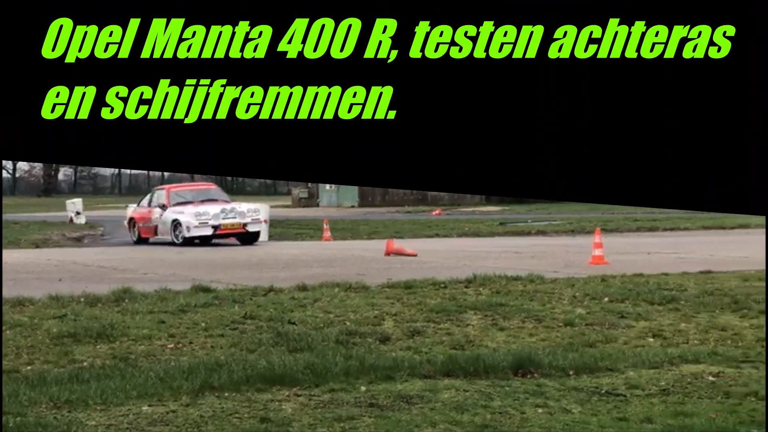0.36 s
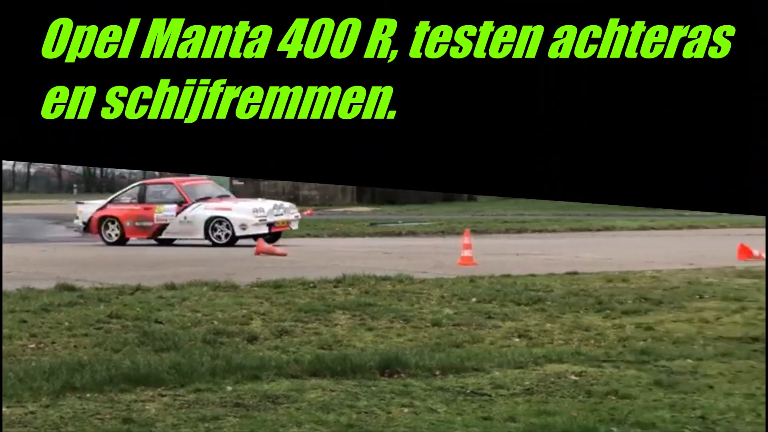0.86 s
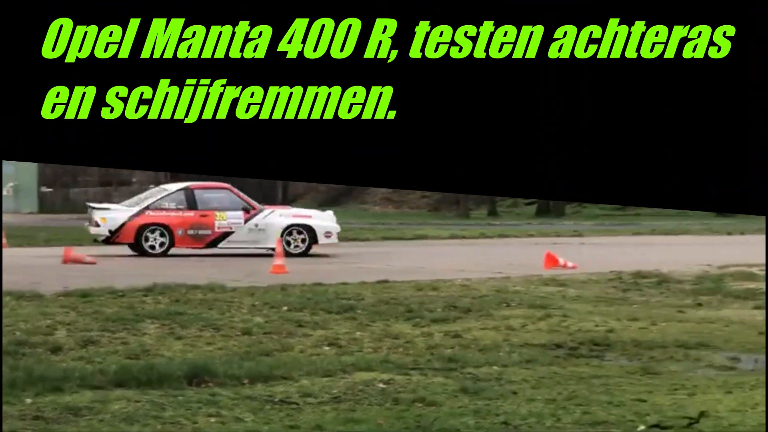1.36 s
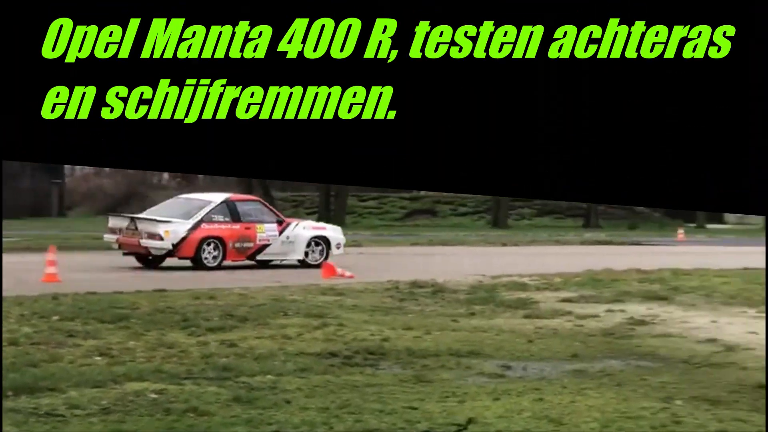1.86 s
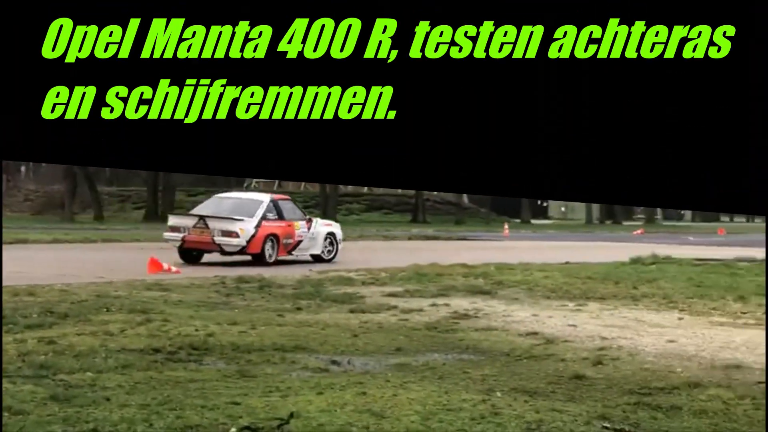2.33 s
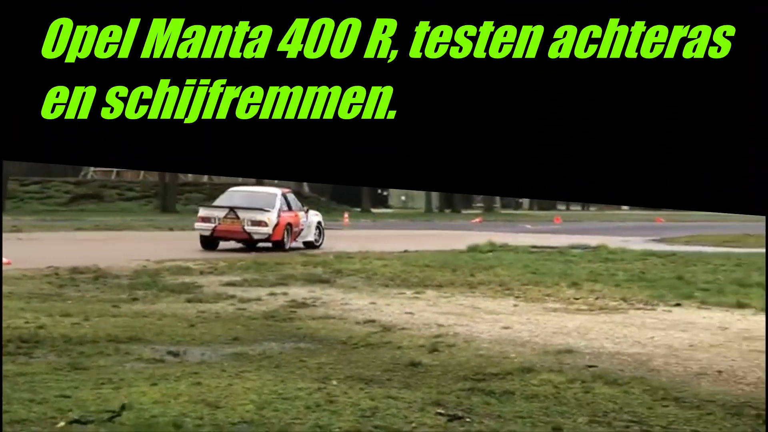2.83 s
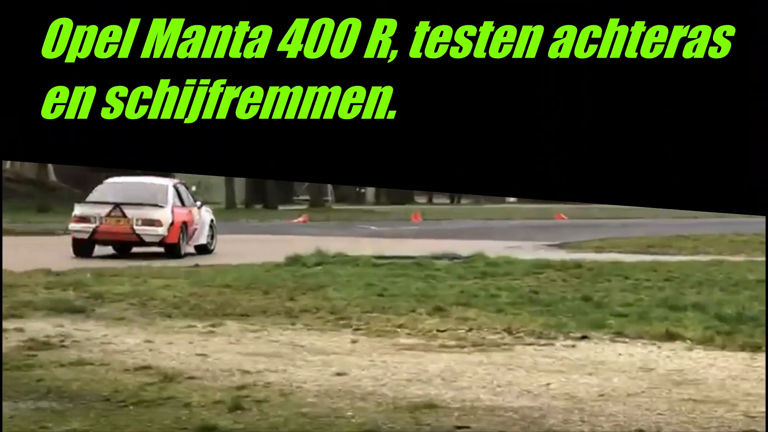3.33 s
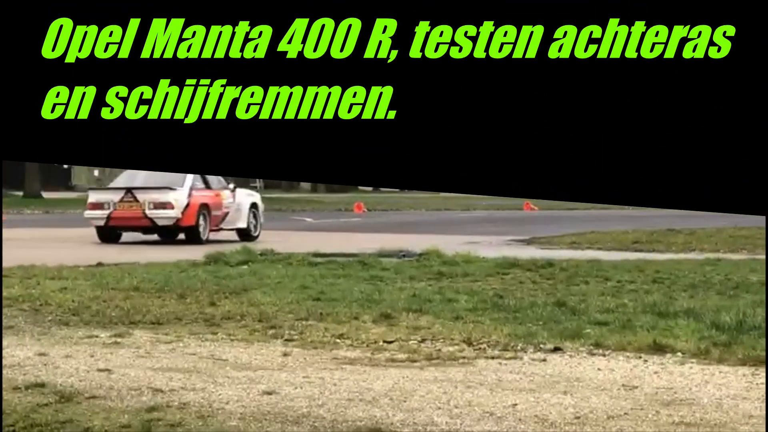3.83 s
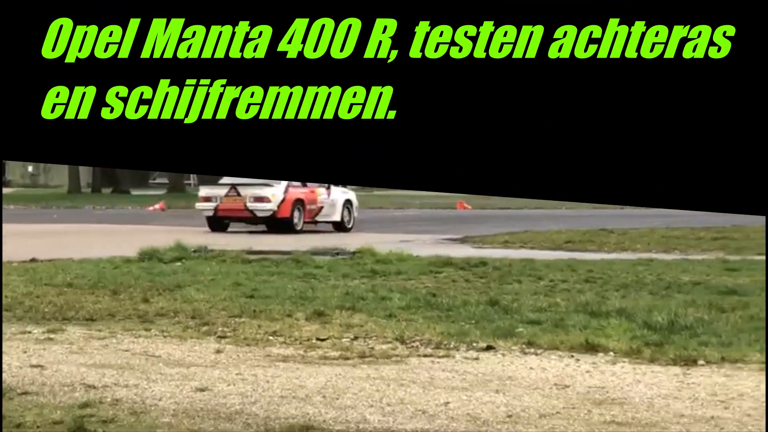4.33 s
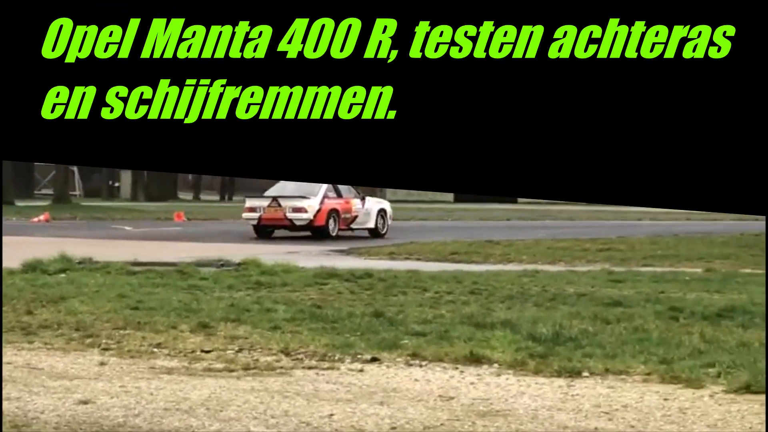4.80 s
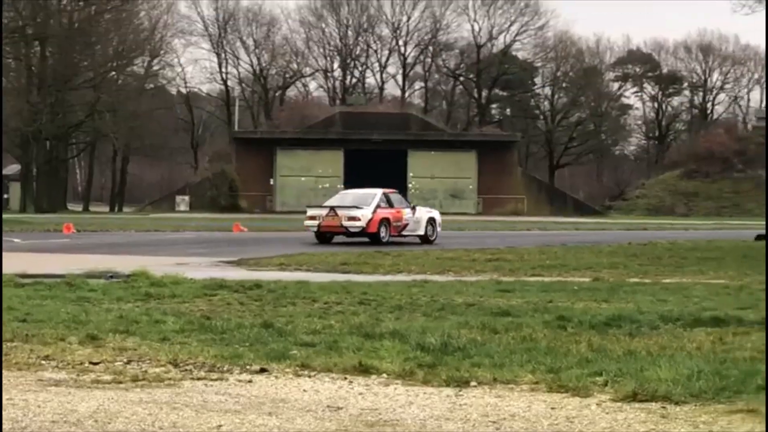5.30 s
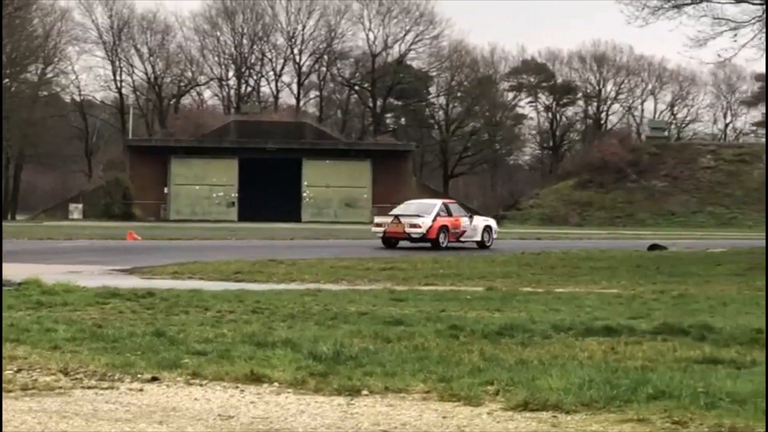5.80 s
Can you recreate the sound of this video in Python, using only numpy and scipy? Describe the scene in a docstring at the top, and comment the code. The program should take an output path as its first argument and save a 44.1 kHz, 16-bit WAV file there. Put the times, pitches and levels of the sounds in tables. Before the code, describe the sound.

A rally car's four-cylinder engine dips, blips and pulls hard past with a loud raspy exhaust, then lifts and drones lower in the distance.

```python
"""A four-cylinder rally car circles an open test track: with the tyres scrubbing it blips the throttle,
pulls hard with its exhaust turned to the listener, lifts off and settles lower in the distance.
The exhaust is a harmonic series on the four-stroke cycle, shaped by pipe, throttle and ground echo.
Gas and tyre roar, grit hiss and rumble are filtered noise; a tree line returns a faint diffuse echo."""
import sys
import numpy as np
from scipy import signal
from scipy.fft import rfft, irfft, next_fast_len
from scipy.io import wavfile
from scipy.ndimage import uniform_filter1d

SR = 44100
rng = np.random.default_rng(int(sys.argv[2]) if len(sys.argv) > 2 else 0)


def store_wav(level_fs):
    """Save 16-bit WAV to argv[1]."""
    pcm = np.round(np.clip(np.atleast_2d(level_fs), -1, 1) * 32767)
    wavfile.write(sys.argv[1], SR, pcm.T.astype(np.int16))


def elevation(decibels):
    """Turn decibel levels (scalar or array-like) into linear amplitude ratios."""
    levels = np.asarray(decibels, float)
    return 10 ** (levels / 20)


N = 272185

# engine speed: (time [s], firing rate [Hz])
REVS = [(0.0, 85.2), (0.14, 84.5), (0.45, 70.7), (0.55, 72.4), (0.7, 114.6), (0.81, 133.1), (0.91, 128),
        (1.01, 139.1), (1.19, 140.9), (1.31, 124.6), (1.56, 115), (1.72, 132.8), (1.83, 139.9),
        (1.97, 125.2), (2.03, 126), (2.23, 137.3), (2.47, 150.7), (2.55, 149.5), (2.63, 135.1),
        (2.77, 135.3), (3.08, 148.2), (3.59, 151.5), (3.76, 144.8), (3.97, 136.6), (4.33, 145.6),
        (4.47, 151.8), (4.57, 138.9), (4.83, 126.6), (5.03, 121.8), (5.22, 101.2), (6.17, 111.3)]
# throttle open: (from [s], to [s])
PULLS = [(.56, 1.198), (1.57, 1.767), (1.92, 2.487), (2.58, 4.475), (5.04, 6.4)]
# how the car is heard along its path: (time [s], tailpipe level [dB], body and tyre level [dB],
# tail turned to the listener [0-1], ground dip [Hz])
PATH = [(0, -25.5, -31, 0.9, 694), (.5, -22, -43, 0.6, 700), (.8, -18.5, -57, 0.22, 700),
        (1.2, -18, -31.5, 0.12, 715), (1.5, -15, -28.5, 0.44, 700), (1.75, -13, -27, 0.7, 660),
        (2.1, -10, -24, .9, 613), (2.45, -9, -26.5, 0.91, 658), (2.8, -12, -31, 0.97, 553),
        (3.1, -10, -34, 0.79, 517), (3.7, -13.5, -40, 0.51, 484.2), (4.2, -15, -46, 0.78, 590.3),
        (4.6, -17.5, -37.5, 0.79, 600.5), (5.0, -20.5, -36.5, 0.96, 574.3), (5.3, -24, -40, .8, 537),
        (6.17, -23.5, -47, 0.53, 581.7)]
# car to listener: (time [s], distance [m])
DISTANCE = [(0, 27.8), (.8, 21.2), (2.1, 14.9), (3, 19.6), (4.35, 39.5), (4.65, 60), (5.2, 72.7),
            (6.17, 73.6)]


def exhaust(angle):
    """Harmonic synthesis: tones at multiples of the four-stroke cycle stay phase-locked to the firing."""
    # pipe response at firing multiples: (frequency [Hz], relative level [dB])
    firing_response = [(300, 3.5), (440, 2), (580, -10), (720, -13.5), (870, -18.5), (1100, -24.5),
                       (1400, -40.5), (1900, -78)]
    # pipe response to the low tones in between: (frequency [Hz], relative level [dB])
    low_response = [(54, -21), (70, -7), (160, 1), (210, 0), (360, -7)]
    # pipe response to the high tones in between: (frequency [Hz], relative level [dB])
    high_response = [(360, -8), (500, -7.5), (670, -12), (810, -11.5), (950, -20), (1200, -25), (1500, -30),
                     (1900, -78)]
    # tones at odd multiples of the cycle: (frequency [Hz], relative level [dB])
    cycle_response = [(30, -28.5), (110, -12.5), (180, -6.5), (260, -18), (400, -13.5), (700, -16.5),
                      (1200, -22.5)]

    hz = curves(REVS)[0]
    boom_db, bark_db, lope_db, growl_db = levels()
    _, _, facing, dip_hz = curves(PATH)
    away = 1 - facing
    rasp_db = 4 - 21.5 * away  # top overtones weaken as the tail turns away
    # firing multiples among the top overtones: always, nose on, at high revs, at low revs
    firing_db = 4.5 + 7.5 * away - .5 * np.maximum(hz - 135, 0) - 11 * np.clip((128 - hz) / 16, 0, 1)

    shut = 1 - throttle()  # a shut throttle burns unevenly: the note burbles
    rough = np.maximum(shut, np.clip((122 - hz) / 16, 0, .8))  # so does an engine at low revs
    rough = np.maximum(rough, .7 * away)  # and one spinning its wheels out of the corner

    out = np.zeros(N)
    for k in [*range(1, 20), *range(20, 60, 2)]:
        ratio = k / 4  # four firings to the cycle
        tone_hz = ratio * hz
        odd, top = k % 2, k > 12
        if odd:
            db = lope_db + along(cycle_response, tone_hz)
        elif k > 10:
            db = growl_db + along(high_response if k % 4 else firing_response, tone_hz)
            db = db + top * (rasp_db + (k % 4 == 0) * firing_db)
        elif k == 4:
            db = boom_db
        elif k == 8:
            db = bark_db
        else:
            db = lope_db + along(low_response, tone_hz)

        # the echo off the track cancels one band
        ground = 1 - 0.73 / (1 + ((tone_hz - dip_hz) / 60) ** 2)
        flicker_db = (.03 * k + .6 + 1.5 * top) * wobble(16)
        flicker_db = flicker_db + 1.7 * rough * wobble(30) + 2 * top * wobble(4)
        drift = (.008 * k + odd * .6 + .2 * rough + .2 * top) * wobble(10)
        drift = drift + .022 * max(k - 12, 0) * wobble(35)
        # manifold branches of unequal length
        branch = rng.uniform(-np.pi, np.pi) * (1 if odd else .5 * top)
        # dispersion: the pipe lets high tones out first, low ones trail
        v = np.maximum(tone_hz / 142, .4)  # tone over the pipe's first resonance
        spread = 2.7 * (v - 1) * (v - 2) / v
        phase = ratio * angle + spread + branch + drift
        out += ground * elevation(db + flicker_db) * np.cos(phase)
    return np.sqrt(2) * out


def firing_angle(jitter):
    """Phase is the integral of frequency: one turn per firing, with burns not quite on time (jitter [rad])."""
    return 2 * np.pi * np.cumsum(curves(REVS)[0]) / SR + jitter * wobble(45)


def throttle(open_s=0.087):
    """Engine load from 0 to 1 as a linear ramp: the pedal goes down slowly and comes up fast."""
    t = np.arange(N) / SR
    shut_s = .035
    return sum(np.clip(np.minimum((t - a) / open_s, 1 + (b - t) / shut_s), 0, 1) for a, b in PULLS)


def levels():
    """Load sets the spectrum: levels [dB] of firing tone (boom), octave (bark), lope and overtones (growl)."""
    # pipe around the octave of the firing tone: (frequency [Hz], relative level [dB])
    octave_response = [(140, -0.5), (200, -1), (230, -0.5), (275, -1), (302, -6.5)]
    # the firing tone dips briefly: (centre time [s], level change [dB])
    sags = [(.8, -7), (.985, -15), (1.84, -8), (2.56, -17), (4.88, -3.5)]
    # uneven burns at a change of throttle shift the tones in between:
    # (centre time [s], length [s], level change [dB])
    pops = [(.58, 0.14, 8), (1.6, 0.11, 6), (1.86, 0.11, -9), (1.96, 0.038, 14), (2.539, 0.027, 15.5),
            (4.95, 0.41, 10)]

    hz, (pipe_db, _, facing, _) = curves(REVS)[0], curves(PATH)
    shut = 1 - throttle()
    lug = np.clip((122 - hz) / 16, 0, 1) * (1 - shut)  # pulling at low revs

    cuts = [(b + .03, .06, -17.5) for a, b in PULLS]  # a moment's drop just after closing
    gulps = [(a, 0.19, -5) for a, b in PULLS]  # a hesitation around each opening
    dips = [(s, 0.082, db) for s, db in sags]
    boom = pipe_db - 2 * shut + bumps(cuts + gulps) + bumps(dips)
    bark = pipe_db - 2.5 - 11 * shut + along(octave_response, 2 * hz)
    # lope: tones in between, from unequal cylinders
    lope = pipe_db - 12.5 - 6 * shut + 9 * lug + bumps(pops)
    overtone_shut = 1 - throttle(open_s=0.18)  # overtones build later
    growl = pipe_db - 11 - 17.5 * overtone_shut + 2.5 * lug * facing
    return boom, bark, lope, growl


def gas_roar(angle):
    """Amplitude-modulated noise of gas and tyres: a puff at each firing, every other one stronger."""
    # (frequency [Hz], relative spectrum level [dB per Hz])
    roar_spectrum = [(250, -4), (500, -9), (900, -4.5), (1300, -7), (1800, -10), (2300, -21.5),
                     (3100, -17.5), (3800, -28.5), (6000, -70)]
    _, roar_db, _, _ = curves(PATH)
    metres, = curves(DISTANCE)
    puff = elevation(1.05 * np.cos(angle + 0.99) + 0.5 * np.cos(angle / 2))
    gas = unit(puff * rush(roar_spectrum, patchy_db=2.5))
    gas = elevation(roar_db - 2.5 * (1.5 - throttle())) * gas  # 2.5 dB weaker with the throttle shut
    return dulled(gas, 1200, -0.2308 * (metres - 30))  # upper part fades over the grass [dB/m]


def grit_hiss():
    """Spherical spreading and air absorption: noise falls as 1/distance and loses treble on the way."""
    # (frequency [Hz], relative spectrum level [dB per Hz])
    hiss_spectrum = [(1200, 0), (2500, -5), (4500, -7.5), (7000, -10.5), (10000, -18), (11500, -24),
                     (12300, -54)]
    # tyres scrub: (centre time [s], length [s], gain [dB])
    slides = [(0, 0.12, 16), (.8, 0.6, 7.5), (1.08, 0.74, 7.5), (1.56, 0.31, 9.5), (1.98, 0.18, 4),
              (2.25, 0.79, 7.5), (1.8, 0.36, 2.5)]
    metres, = curves(DISTANCE)
    hiss_db = -14 - 20 * np.log10(metres) - 1.5 * (1 - throttle()) + bumps(slides)
    grit = elevation(hiss_db + .8 * wobble(12)) * rush(hiss_spectrum, patchy_db=1.1)
    return dulled(grit, 8360, -0.3879 * (metres - 30))  # treble lost in the air [dB/m]


def rumble():
    """Low-frequency filtered noise that follows the tailpipe level and the load."""
    # (frequency [Hz], relative spectrum level [dB per Hz])
    rumble_spectrum = [(20, -67), (45, -22), (75, 11.5), (130, 5), (210, 14.5), (330, 3), (500, -5.5),
                       (900, -38)]
    pipe_db = curves(PATH)[0]
    rumble_db = pipe_db - 13 - 0.5 * (1 - throttle())
    return elevation(rumble_db) * rush(rumble_spectrum, patchy_db=1.2)


def trees(x):
    """Diffuse reverberation: a late answer from the tree line, each frequency dying at its own speed."""
    # (frequency [Hz], 60 dB decay time [s])
    decay_times = [(100, 1), (1000, 1), (5000, 0.05)]
    hz, t, z = signal.stft(rng.standard_normal(SR // 2), SR, nperseg=256)
    decay_db = -60 * t / along(decay_times, hz)[:, None]
    tail = signal.istft(z * elevation(decay_db), SR, nperseg=256)[1]
    late = np.pad(x, (2000, 0))  # delay [samples]
    return signal.fftconvolve(late, tail / np.linalg.norm(tail))[:N]


def rush(spectrum, patchy_db):
    """Subtractive synthesis: white noise with patches of random gain, coloured and scaled to rms 1."""
    z = signal.stft(rng.standard_normal(N), nperseg=512)[2]
    field = uniform_filter1d(rng.standard_normal(z.shape), 6, 0)
    field = uniform_filter1d(field, 10, 1)
    x = signal.istft(z * elevation(patchy_db * unit(field)), nperseg=512)[1][:N]
    m = next_fast_len(N + 8192)
    gain = elevation(along(spectrum, np.fft.rfftfreq(m, 1 / SR)))
    return unit(irfft(rfft(x, m) * gain, m)[:N])


def dulled(x, edge_hz, db):
    """High-shelf filtering: everything above the edge changes by db."""
    top = signal.sosfiltfilt(signal.butter(2, edge_hz, "high", fs=SR, output="sos"), x)
    return x + (elevation(db) - 1) * top


def treble_gaps(x):
    """Band splitting: everything above the split drops out briefly."""
    # (centre time [s], length [ms], level change [dB])
    gaps = [(0.814, 28, -14.5), (0.887, 43, -43), (1.111, 29, -11), (2.038, 42, -36), (2.563, 8.6, -25),
            (2.731, 35, -10), (2.924, 14, -16), (3.492, 48.3, -17.5), (3.81, 38.7, -44), (3.864, 28, -13),
            (4.183, 14, -23), (4.355, 28, -14), (5.442, 12, -23), (5.74, 20, -16), (5.909, 11, -18),
            (5.996, 17, -14), (6.125, 14, -21)]
    treble = signal.sosfiltfilt(signal.butter(4, 2100, "high", fs=SR, output="sos"), x)
    t = np.arange(N) / SR
    # flat-bottomed dips with sloping sides
    dip_db = sum(db * np.clip(1.6 - 3.2 * np.abs(t - s) / (ms / 1000), 0, 1) for s, ms, db in gaps)
    return x - (1 - elevation(dip_db)) * treble


def unit(x):
    """Normalise the mean power: scale to rms 1."""
    return x / np.sqrt(np.mean(x ** 2) + 1e-20)


def along(points, hz):
    """Interpolate (frequency [Hz], value) points on a logarithmic frequency axis."""
    f, v = np.transpose(points)
    return np.interp(np.log(hz + 1), np.log(f + 1), v)


def curves(rows):
    """Interpolate linearly in time: one value per sample for each column after the time."""
    s, *cols = np.transpose(rows)
    return [np.interp(np.arange(N) / SR, s, c) for c in cols]


def wobble(rate):
    """Low-rate random modulation: Gaussian knots, rate of them a second, joined by lines."""
    knot = np.arange(N) * (np.clip(rate, .1, 60) / SR)
    return np.interp(knot, np.arange(400), rng.standard_normal(400))


def bumps(rows):
    """Superpose triangular envelopes from (centre time [s], length [s], height) rows."""
    t = np.arange(N) / SR
    return sum(h * np.clip(1 - 2 * np.abs(t - s) / length, 0, 1) for s, length, h in rows)


def scene():
    """Superposition of the car's sources and the echo of its exhaust in the open."""
    angle = firing_angle(jitter=.025)
    tones = exhaust(angle)
    echo = elevation(-25) * trees(tones)
    noise = gas_roar(angle) + grit_hiss() + rumble()
    return (tones + echo + noise)[None]


def roll_off(x):
    """The treble ends steeply here."""
    return signal.sosfilt(signal.butter(12, 11890, fs=SR, output="sos"), x)


def record(dry):
    """Microphone response: high-pass filtering loses the deepest bass, saturation rounds the highest peaks."""
    x = signal.sosfilt(signal.butter(2, 45, "high", fs=SR, output="sos"), dry)
    x = x / (1 + np.abs(x / .97) ** 5) ** (1 / 5)
    mix = treble_gaps(x)
    return roll_off(mix)


dry = scene()
out = record(dry)
store_wav(out)
```